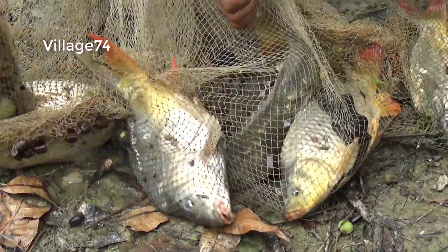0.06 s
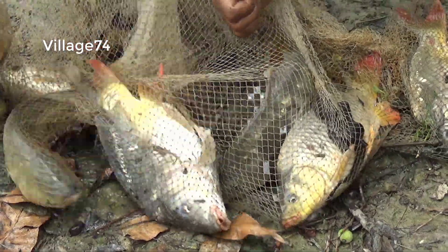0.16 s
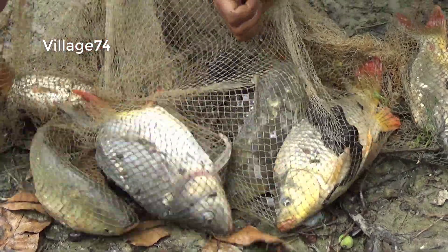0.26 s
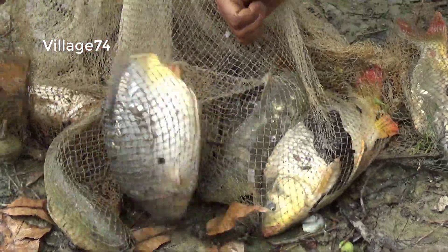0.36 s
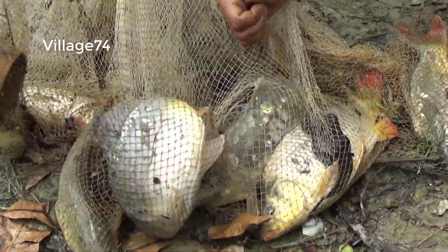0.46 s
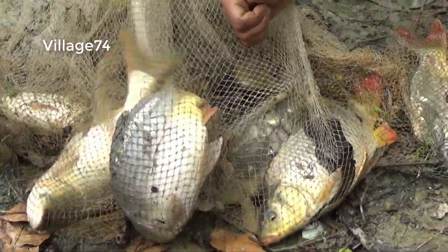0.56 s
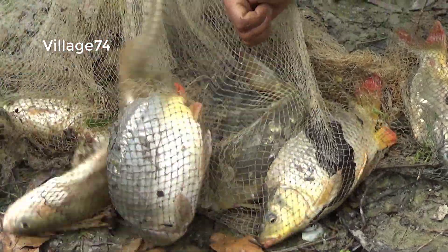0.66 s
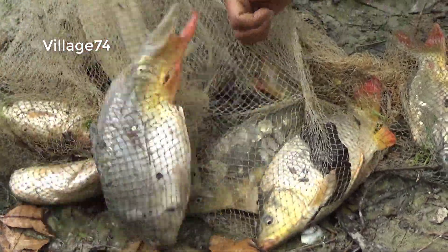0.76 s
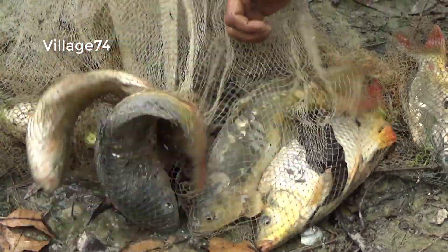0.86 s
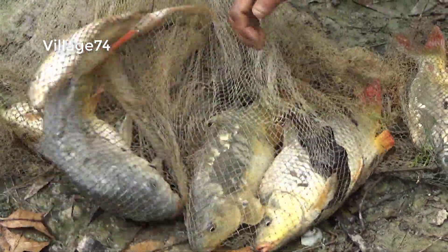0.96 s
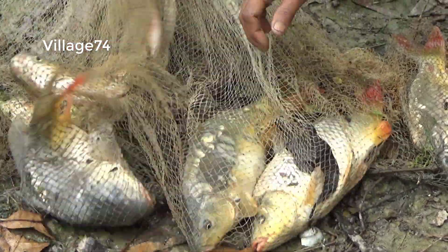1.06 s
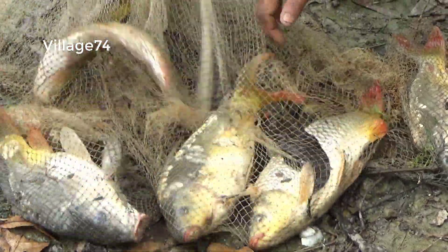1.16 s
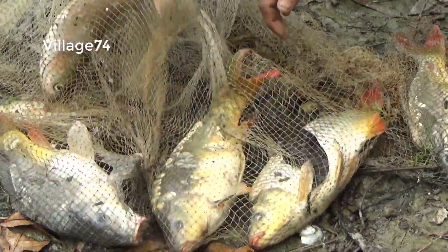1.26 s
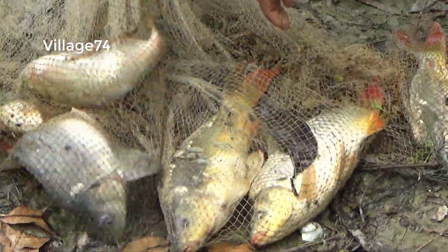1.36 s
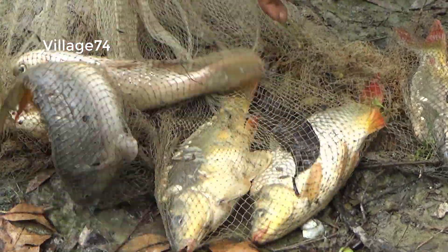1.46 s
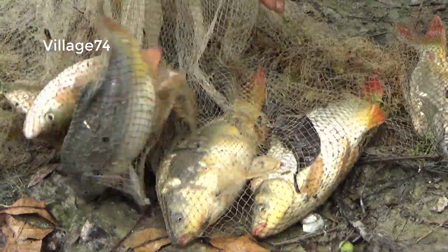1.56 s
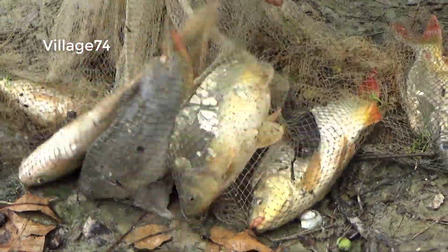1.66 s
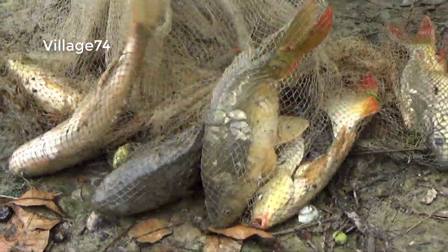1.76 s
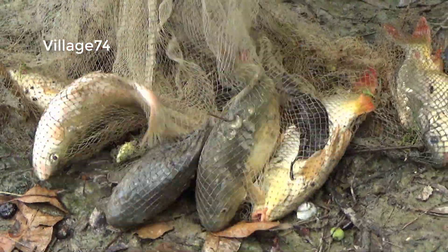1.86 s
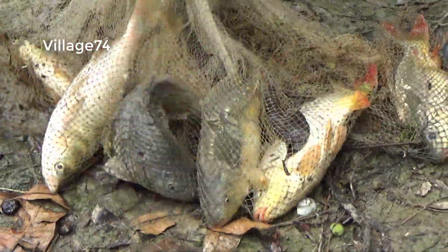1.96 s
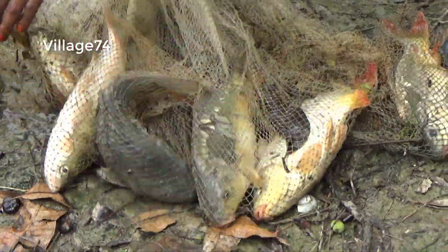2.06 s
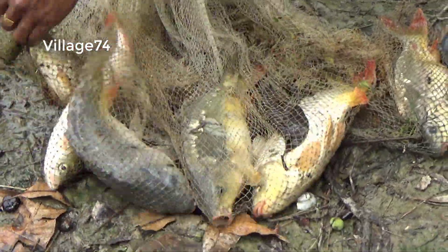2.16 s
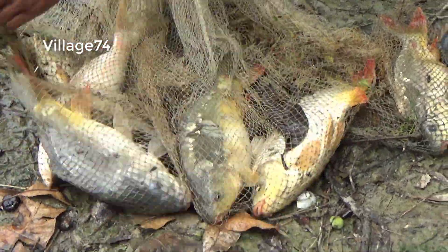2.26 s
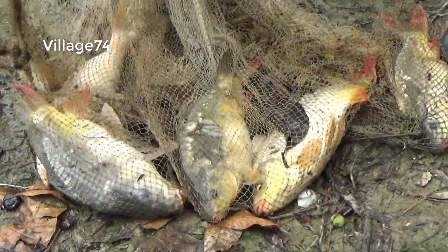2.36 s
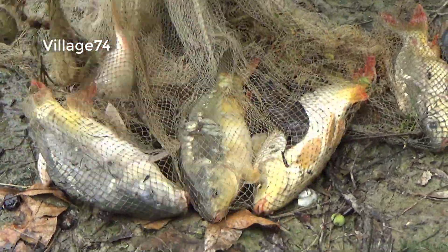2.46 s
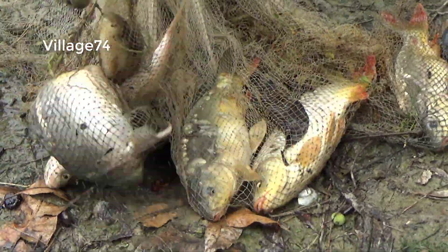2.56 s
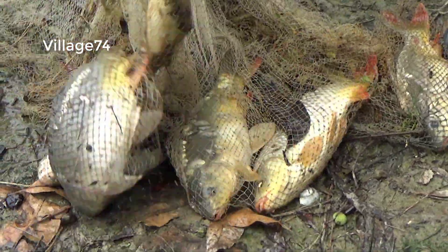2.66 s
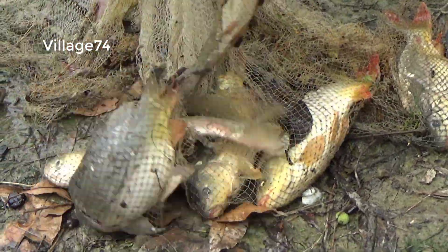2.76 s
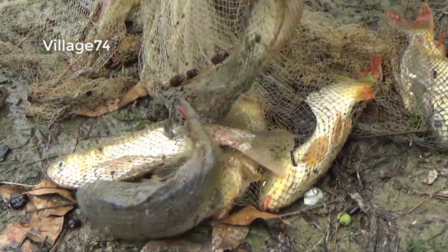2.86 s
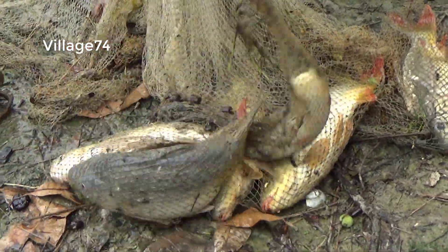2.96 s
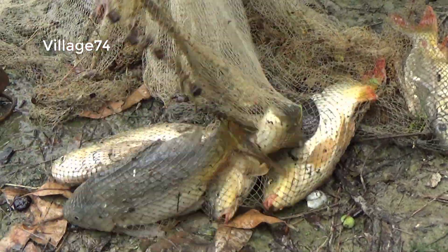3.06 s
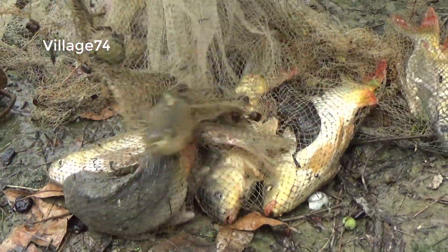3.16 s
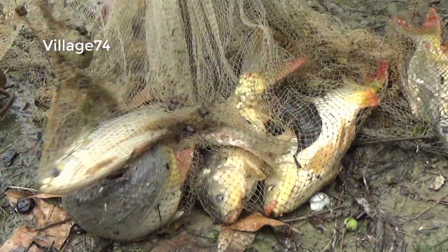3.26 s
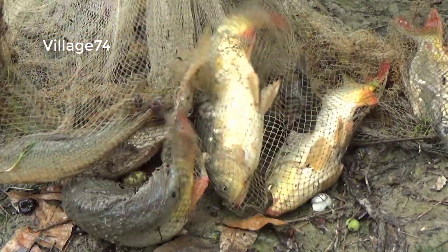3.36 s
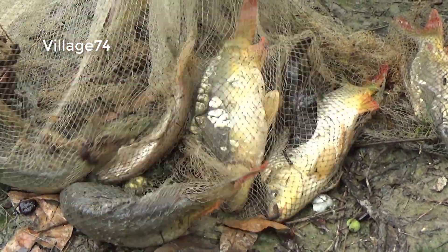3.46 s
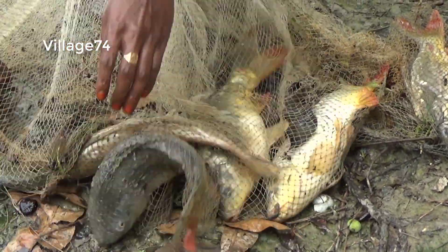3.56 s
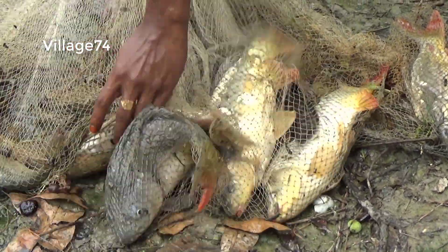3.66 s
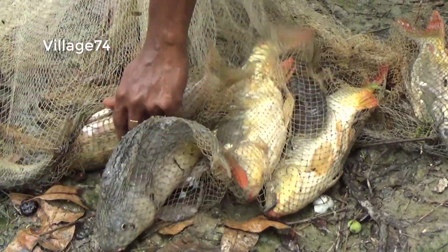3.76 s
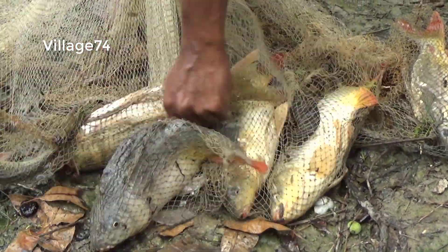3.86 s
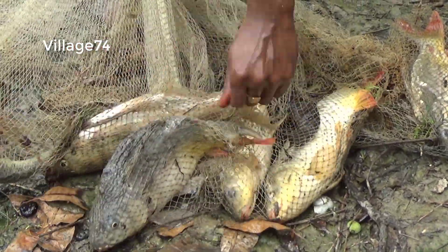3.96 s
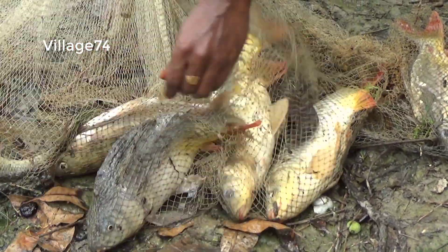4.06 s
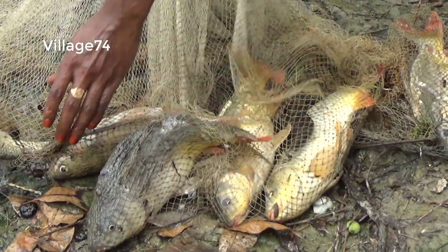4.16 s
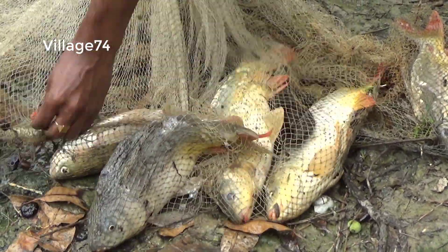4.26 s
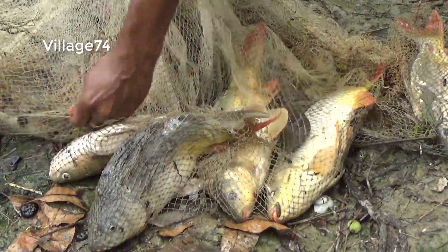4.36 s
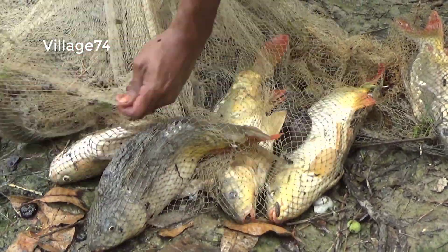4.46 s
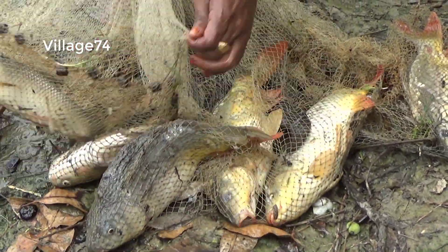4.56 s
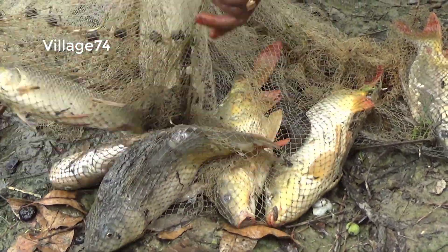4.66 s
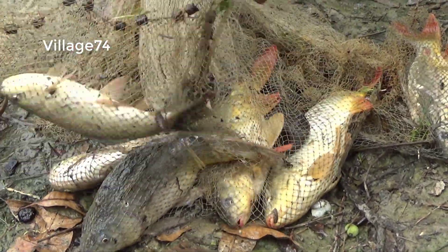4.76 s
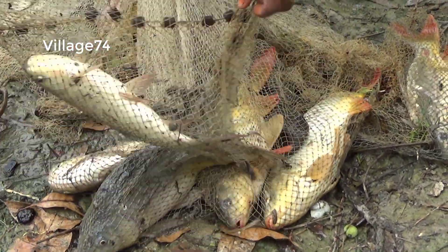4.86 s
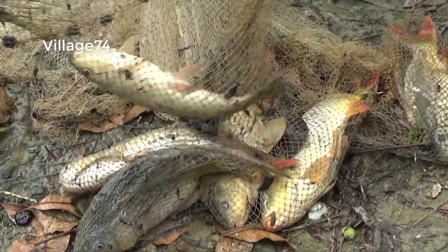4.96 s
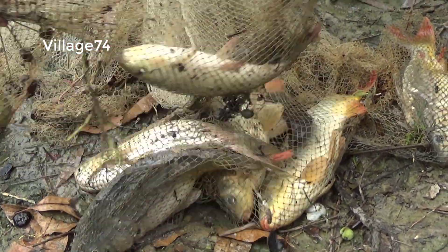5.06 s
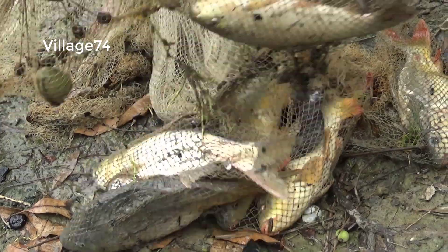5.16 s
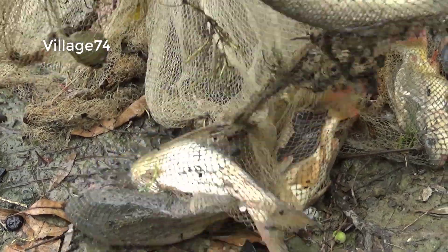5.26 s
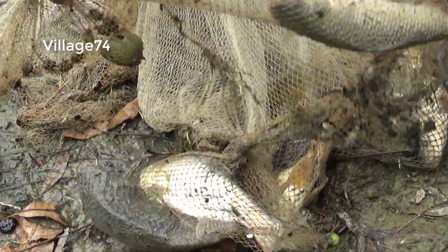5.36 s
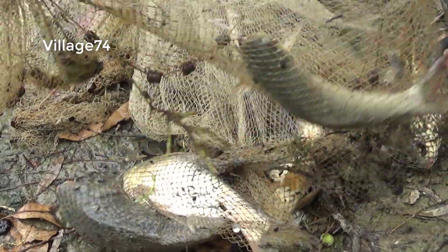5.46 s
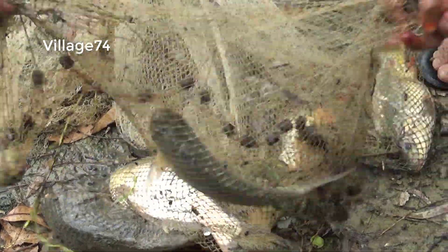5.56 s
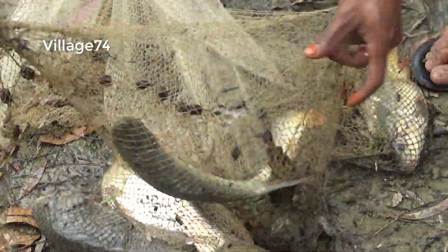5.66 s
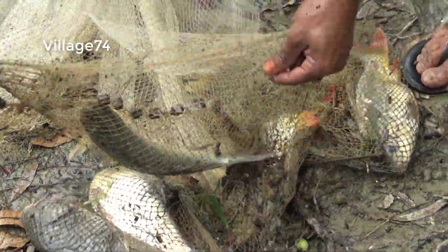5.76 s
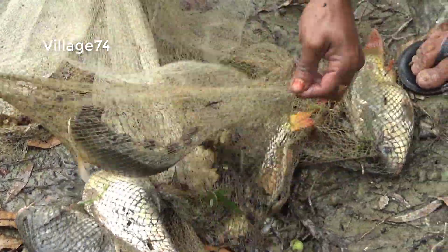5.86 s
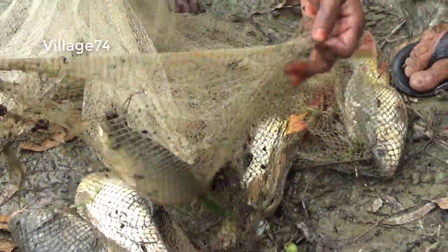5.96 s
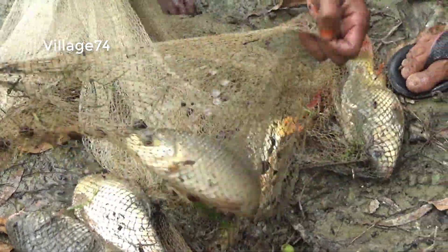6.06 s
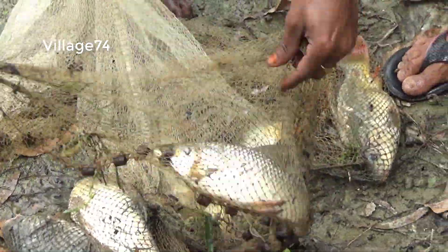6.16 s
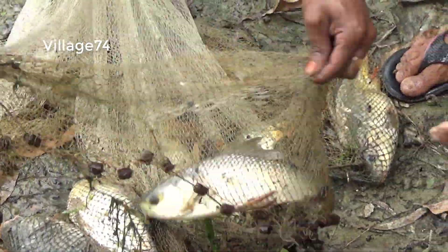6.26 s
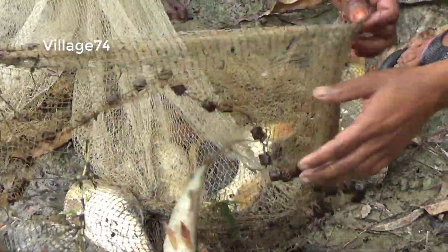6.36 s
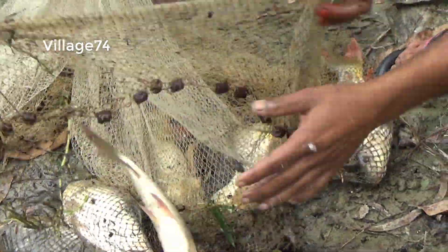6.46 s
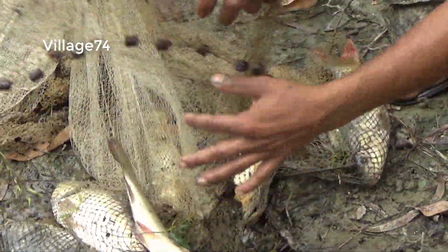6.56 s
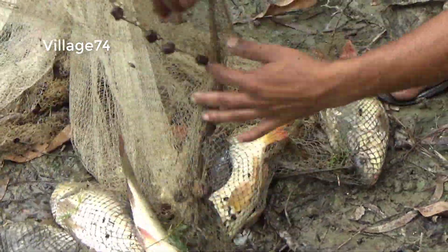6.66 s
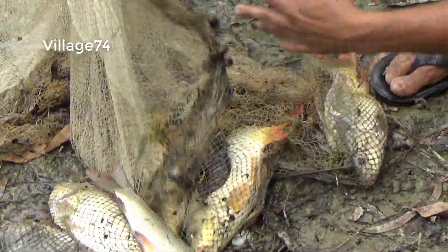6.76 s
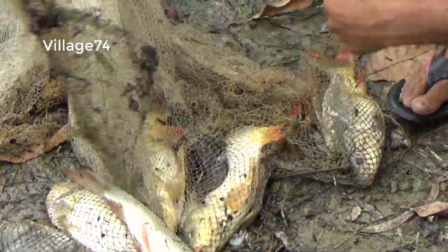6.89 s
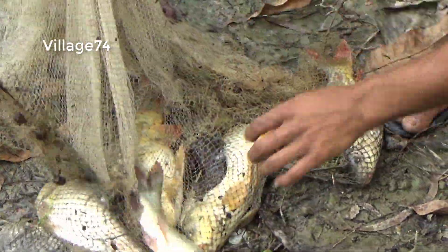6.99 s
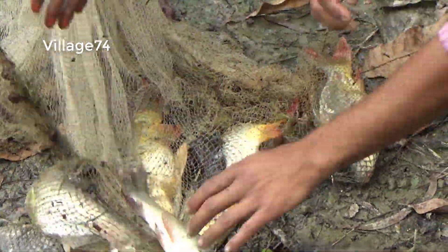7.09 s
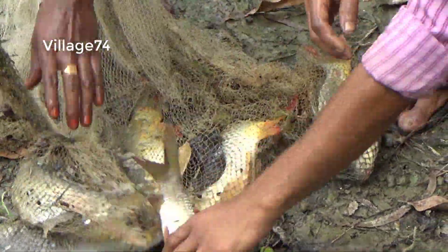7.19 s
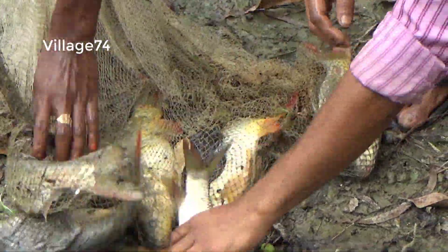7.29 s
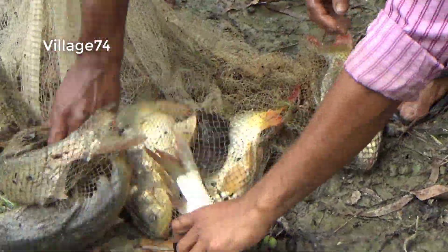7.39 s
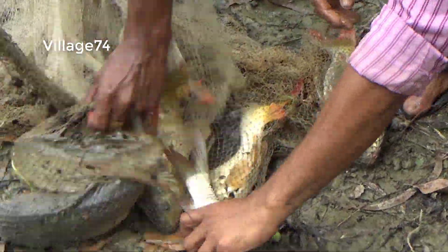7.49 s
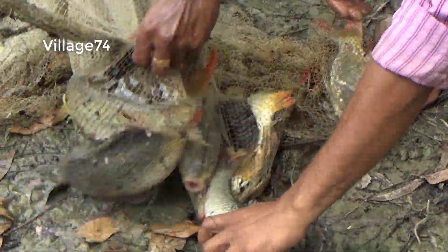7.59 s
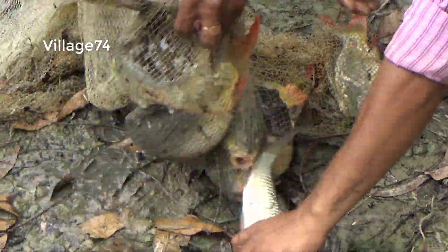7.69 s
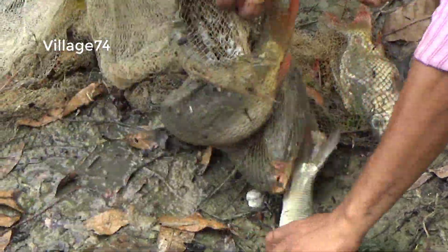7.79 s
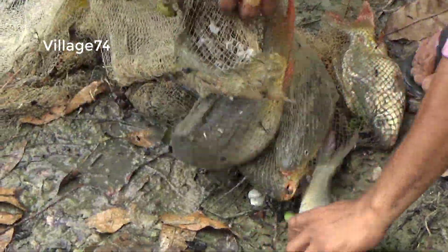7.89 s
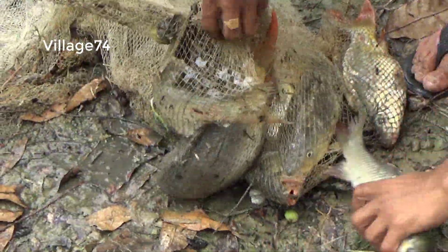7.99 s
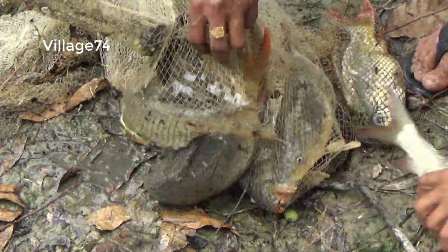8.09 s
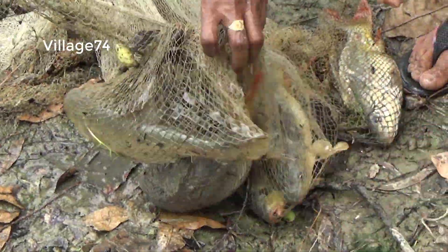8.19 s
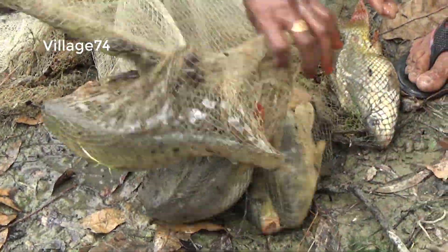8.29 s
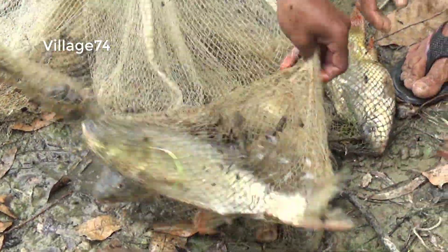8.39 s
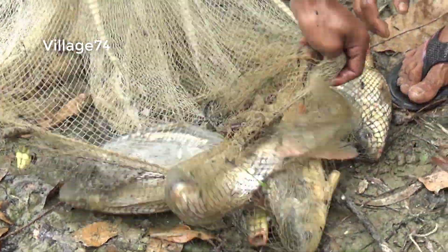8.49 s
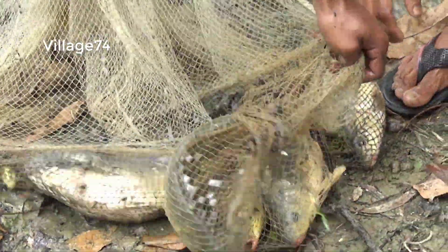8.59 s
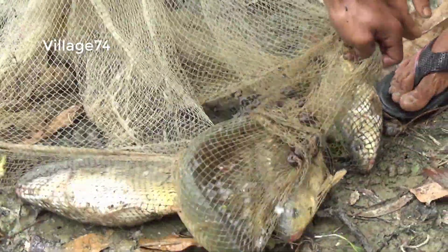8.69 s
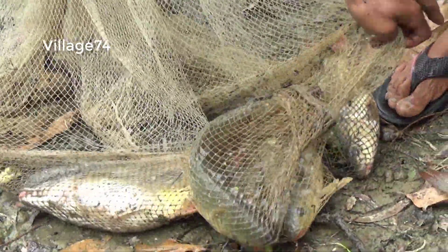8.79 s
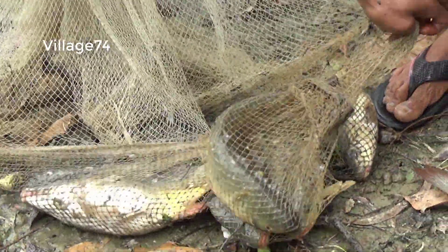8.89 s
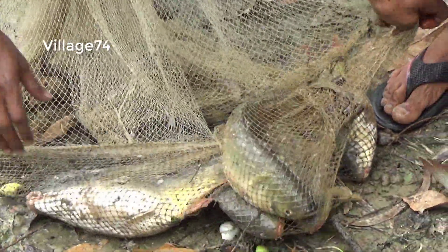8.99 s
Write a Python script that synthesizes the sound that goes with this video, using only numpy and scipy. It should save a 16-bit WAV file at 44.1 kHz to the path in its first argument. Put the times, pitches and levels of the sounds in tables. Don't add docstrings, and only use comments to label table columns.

```python
import sys
import numpy as np
from scipy import signal
from scipy.fft import rfft, irfft
from scipy.io import wavfile

SR = 44100
rng = np.random.default_rng(int(sys.argv[2]) if len(sys.argv) > 2 else 0)


def log_audio(samples):
    frames = np.atleast_2d(samples).T
    limited = np.clip(frames, -1, 1)
    pcm = np.round(limited * 32767).astype(np.int16)
    wavfile.write(sys.argv[1], SR, pcm)


def volts_from_db(level):
    exponent = np.asarray(level, float) / 20
    return 10 ** exponent


N = 398223


def rms_one(x):
    return x / np.sqrt(np.mean(x ** 2) + 1e-20)


def at_hz(points, hz):
    curve_hz, values = np.array(points)[:, 0], np.array(points)[:, 1]
    return np.interp(np.log(hz), np.log(curve_hz), values)


def band(x, low_hz, high_hz):
    return signal.sosfilt(signal.butter(2, [low_hz, high_hz], "band", fs=SR, output="sos"), x)


def resonance(x, hz, width_hz):
    r = np.exp(-np.pi * width_hz / SR)
    feedback = [1, -2 * r * np.cos(2 * np.pi * hz / SR), r * r]
    return signal.lfilter([(1 - r * r) / 2, 0, (r * r - 1) / 2], feedback, x)


def drift(rate):
    r = np.exp(-80 * np.pi * rate / SR)
    white = rng.standard_normal(N // 40 + 2002)
    slow = signal.lfilter([1], [1, -2 * r, r * r], white)[2000:]
    return np.interp(np.arange(N) / 40, np.arange(len(slow)), rms_one(slow))


def coloured(white, spectrum):
    # pitch in Hz, likeness from 0 to 1.
    likeness = [(30, .994), (70, .98), (250, .88), (800, .94), (2500, .9), (5000, .93), (9000, .98),
                (13000, .975)]
    hz = np.maximum(np.fft.rfftfreq(N, 1 / SR), 1)
    alike = np.clip(at_hz(likeness, hz), 0, 1)
    mid, side = rfft(white) * volts_from_db(at_hz(spectrum, hz))
    mid, side = mid * np.sqrt(1 + alike), side * np.sqrt(1 - alike)
    return rms_one(irfft(np.array([mid + side, mid - side]), N))


def crackle(per_s, spread_db, smooth_db):
    sizes = volts_from_db(spread_db * np.minimum(rng.exponential(1, N), 3))
    born = rng.random(N) < per_s * volts_from_db(6.0 * drift(25)) / SR
    ticks = signal.lfilter([1], [1, -.93], sizes * born)
    return (rms_one(ticks) + volts_from_db(smooth_db)) * rng.standard_normal((2, N))


def dying(seconds, level_db, t60, rise_s):
    out = np.zeros(N)
    for s, db, fall in np.broadcast(seconds, level_db, t60):
        fall, start = np.clip(fall, .0015, .3), round(s * SR)
        t = np.arange(min(int(fall * SR), N - start)) / SR
        out[start:start + len(t)] += volts_from_db(db - 60 * t / fall) * (1 - np.exp(-t / rise_s))
    return out


def spread(pair, side_db):
    return pair[0] + volts_from_db(side_db) * pair[1] * np.array([[1], [-1]])


def soft_blows():
    # start in seconds, ring peak in dB.
    pats = [(.1, -28), (.31, -22.5), (.319, -18), (0.461, -31), (.95, -26), (6.36, -28), (6.83, -32),
            (7.001, -40), (.966, -25.5), (.978, -35), (.992, -43), (.434, -24.5), (1.176, -23),
            (1.602, -27), (2.029, -26.5), (3.186, -17.5), (3.214, -15.5), (3.553, -27.5), (4.252, -24.5),
            (4.615, -35.5), (4.638, -35), (5.251, -26), (5.375, -18.5), (5.527, -29.5), (5.579, -19),
            (5.641, -15), (5.659, -20.5), (5.765, -23.5), (6.342, -32.5), (6.514, -27), (6.803, -36),
            (6.859, -33), (7.02, -21.5), (7.107, -25.5)]
    # start in seconds, smack in dB.
    taps = [(.167, -61), (.344, -51), (.499, -33), (.531, -27.5), (.574, -30), (0.817, -42), (.863, -23.5),
            (.929, -28), (3.908, -28.5), (8.735, -45), (8.94, -33), (1.74, -26), (1.92, -33),
            (2.261, -31.5), (2.603, -33.5), (3.319, -30), (3.588, -28), (5.855, -35), (6.565, -33),
            (7.761, -23), (7.864, -40.5), (8.467, -33), (8.563, -41)]
    # start in seconds, ring peak in dB.
    more_pats = [(0.167, -24), (0.332, -15), (0.36, -22), (0.769, -28), (0.822, -34), (0.476, -28),
                 (1.325, -26.5), (0.545, -24), (1.517, -33), (1.763, -43), (2.085, -31), (2.132, -32.5),
                 (2.152, -32), (2.811, -27.5), (3.255, -19.5), (3.386, -7), (3.502, -30), (3.609, -26),
                 (3.657, -26), (3.82, -26), (4.067, -26), (0.585, -31.5), (5.389, -20), (5.602, -14),
                 (5.734, -29.5), (5.752, -35), (5.79, -34), (5.856, -18.5), (2.062, -28), (6.818, -35),
                 (6.845, -32), (6.874, -31), (7.079, -36), (8.443, -34), (8.579, -24), (8.78, -38)]
    pocket_hz, pocket_spread_hz = 792.3, 35
    pat_smack_db, tap_ring_db, more_pats_gain_db = -15.5, -2, -5.5
    rows = [(s, db, db + pat_smack_db) for s, db in pats]
    rows += [(s, db + tap_ring_db, db) for s, db in taps]
    rows += [(s, db + more_pats_gain_db, db + pat_smack_db) for s, db in more_pats]
    return [(s, ring_db, pocket_hz + pocket_spread_hz * rng.standard_normal(), smack_db)
            for s, ring_db, smack_db in rows]


def slaps():
    # start in seconds, ring peak in dB, ring pitch in Hz, smack in dB.
    blows = [(0.208, -20, 854, -31), (0.381, -12, 770, -20), (.797, -18.5, 807, -30),
             (.88, -15.5, 760, -21), (1.156, -25.5, 845, -18), (1.207, -8, 803, -14.5),
             (1.221, -7.5, 863, -19), (1.237, -7, 786, -12.5), (1.252, -6.5, 824, -14.5),
             (1.392, -13, 804, -14), (1.408, -10, 850, -14), (3.002, -10.5, 730, -16.5),
             (3.015, -9, 785, -11), (3.05, -13.5, 795, -21), (3.37, -16.5, 740, -10.5),
             (3.373, -14, 726, -30), (3.395, -16.5, 755, -15.5), (4.43, -30, 896, -21),
             (4.924, -11, 775, -27), (4.954, -13, 745, -12), (5.082, -26, 757, -26), (5.207, -19, 775, -27),
             (5.389, -22, 853, -21), (5.611, -10.5, 795, -26.5), (5.873, -14.5, 761, -34),
             (6.984, -21, 730, -24), (7.054, -24, 782, -16), (7.072, -30, 810, -31), (.812, -26, 960, -26),
             (.822, -32, 980, -43), (7.39, -37, 820, -28.5), (8.67, -11.5, 858, -10)]
    # pitch in Hz, width in Hz, level in dB.
    body = [(1257, 59, -3), (1520, 130, -6), (1960, 270, -5), (2290, 83, -9.5), (2870, 24, -4),
            (3380, 120, -12), (3900, 46, -9.5), (4620, 390, -35), (6070, 920, -32)]
    s, ring_db, ring_hz, smack_db = np.transpose(blows + soft_blows())

    hollow, kicks = np.zeros(N), rng.standard_normal((len(s), 1500))
    t = np.arange(round(.12 * SR)) / SR
    kick_t = t[:1500]
    for start, db, hz, push in zip((s * SR).astype(int), ring_db, ring_hz, kicks):
        push = push + 0.14 * np.sin(2 * np.pi * hz * kick_t)
        kick_t60 = np.clip(0.017 + 0.000008 * db ** 2, .006, .2)
        push = push * volts_from_db(-60 * kick_t / kick_t60)
        push = push * (1 - np.exp(-kick_t / 0.0015))
        tone = np.sin(2 * np.pi * hz * t)
        modes = tone * volts_from_db(-60 * t / 0.035) + 0.05 * tone * volts_from_db(-60 * t / 0.11)
        ring = signal.fftconvolve(modes, push)[:min(len(t), N - start)]
        hollow[start:start + len(ring)] += volts_from_db(db) * ring / np.abs(ring).max()
    hollow = band(band(hollow, 444, 1190), 753, 3400)

    white, chance = rng.standard_normal((2, N)), 2 * rng.random((len(s), len(body))) - 1
    hit = dying(s, smack_db - 5.0, 0.01, 0.00019)
    after = dying(s, smack_db - 18.5, 0.22, 0.019)
    smack = rms_one(band(white, 610, 6200)) * (hit + after)
    for (hz, width_hz, db), own in zip(body, chance.T):
        strength = dying(s, smack_db + db + 12.0 + 7.7 * own, 0.045, 0.001)
        smack = smack + resonance(white * strength, hz, width_hz)
    return (hollow * volts_from_db([[.25], [-.25]]) + spread(smack, -12.5)) * volts_from_db([[.6], [-.6]])


def clicks():
    # start in seconds, peak in dB, pitch in Hz.
    hard = [(0.194, -16.5, 2670), (0.5596, -32, 3180), (0.596, -19, 3400), (0.8144, -22, 2850),
            (0.943, -20, 1420), (1.1047, -17.5, 2970), (1.125, -28, 3150), (1.193, -24, 3800),
            (1.517, -24.5, 1830), (1.6764, -30, 1770), (1.7619, -26, 1970), (1.8776, -35, 3400),
            (2.77, -26, 3130), (3.1363, -19, 4270), (3.8948, -24, 1490), (4.157, -24, 2970),
            (4.248, -13, 3140), (4.4298, -13.5, 2500), (5.0604, -19, 2770), (5.609, -16.5, 2350),
            (6.5895, -26.5, 2080), (7.433, -25, 3380), (7.65, -22, 2980), (8.733, -18.5, 1930)]
    # start in seconds, peak in dB, pitch in Hz.
    further_knocks = [(0.109, -21, 1100), (.735, -38, 1490), (.798, -19.5, 1160), (.81, -20, 2300), (.824, -19, 1300),
                      (1.1553, -15, 2050), (1.167, -17, 1580), (1.176, -21, 2000), (1.194, -28, 1400),
                      (2.262, -28, 1537), (2.604, -25, 1690), (4.238, -19, 3020), (4.4294, -10.5, 1890),
                      (4.925, -16, 580), (4.9534, -9, 2200), (5.872, -22, 2480), (6.911, -28.5, 1690),
                      (6.957, -28, 1400), (6.983, -23.5, 2560), (7.069, -20, 2300), (7.81, -30, 1280),
                      (8.404, -23.5, 1500), (8.446, -33, 990), (8.562, -31, 850), (8.669, -18, 1100),
                      (8.712, -27, 1400)]
    width_share, t60_s, gain_db = 0.18, 0.024, 9 - 14
    t = np.arange(round(.05 * SR)) / SR
    out = np.zeros((2, N + len(t)))
    white = rng.standard_normal((len(hard + further_knocks), 2, len(t)))
    strength = volts_from_db(-60 * t / t60_s) * (1 - np.exp(-t / 0.00063))
    for (s, db, hz), pair in zip(hard + further_knocks, white):
        burst = resonance(pair * strength, hz, width_share * hz)
        start = round(s * SR)
        out[:, start:start + len(t)] += volts_from_db(db + gain_db) * spread(burst / np.abs(burst[0]).max(), -18.0)
    return out[:, :N]


def sinker():
    # time in seconds, peak in dB, pitch in Hz, width in Hz.
    weight = (8.671, -17.5, 2925, 27)
    s, peak_db, hz, width_hz = weight
    knock = np.zeros(N)
    knock[round(s * SR)] = volts_from_db(peak_db) * SR / (2 * np.pi * width_hz)
    return resonance(knock, hz, width_hz)


def thuds():
    # start in seconds, peak in dB.
    landings = [(0.873, -19), (1.948, -23), (2.94, -30.5), (3.357, -35), (3.807, -21), (4.148, -27),
                (4.248, -32), (4.427, -30), (4.95, -38), (5.093, -22.5), (5.137, -24.5), (5.482, -30),
                (6.977, -26.5), (7.022, -32), (7.09, -37), (8.345, -31), (8.403, -25), (8.606, -25),
                (8.906, -29), (8.94, -26)]
    s, peak_db = np.transpose(landings)
    push = rng.standard_normal((2, N)) * dying(s, peak_db - 12.5, 0.05, 0.0022)
    upper = band(band(push, 161, 388), 70, 400) * volts_from_db(26.5)
    deep = band(push, 46, 130) * volts_from_db(21.5)
    return spread(upper + deep, -40.0)


def snaps():
    # start in seconds, peak in dB.
    threads = [(0.1212, -8.5), (0.2454, -8.5), (0.266, -9.5), (0.46, -11.5), (0.575, -1.5), (0.611, -10),
               (0.671, -17.5), (0.711, -12), (0.7643, -17), (0.8707, -3.5), (0.907, -2.5), (1.033, -9),
               (1.425, -9), (1.5615, -13), (1.872, -14), (2.246, -12), (2.985, -11), (3.18, -3.5),
               (3.202, -1), (3.2157, -1.5), (4.8702, -9.5), (5.974, -10), (6.321, -13), (6.3554, -18),
               (7.011, -4), (8.4726, -7.5), (8.5184, -5), (8.532, -3.5), (8.845, -17), (8.8836, -12.5)]
    # start in seconds, peak in dB.
    faint = [(0.2737, -19), (0.5023, -14), (0.5862, -14), (0.6374, -23), (0.7724, -16), (0.828, -20),
             (0.8826, -14), (0.9552, -16.5), (1.0226, -17.5), (1.062, -17), (1.136, -18), (1.152, -18),
             (1.1742, -18), (1.221, -15), (1.3014, -27), (1.6518, -19), (1.6806, -20), (1.7134, -20),
             (2.374, -29), (2.687, -30), (3.1363, -12), (3.282, -21), (3.294, -20), (3.3418, -21),
             (3.3838, -7), (3.5, -23), (3.9414, -21), (4.0712, -20), (4.448, -14), (4.8234, -28),
             (4.8876, -23), (5.3048, -19), (5.3295, -24), (5.4074, -24), (5.6397, -19.5), (5.656, -20),
             (5.7593, -24), (5.832, -22), (5.848, -21), (6.429, -25), (6.5281, -27), (6.56, -20.5),
             (6.785, -24), (6.825, -22.5), (7.1571, -36), (7.527, -25), (7.6042, -27), (7.8012, -26),
             (8.136, -23), (8.2237, -29), (8.2344, -23), (8.4936, -15), (8.539, -12.5), (8.5464, -21),
             (8.5634, -13), (8.63, -16), (8.735, -19.5), (8.8159, -19.5), (8.916, -16), (8.9416, -21)]
    # start in seconds, peak in
    # dB, lower part in dB relative to it.
    pulls_and_whips = [(.288, -18, -25), (0.727, -2, -7), (0.737, -6, -7.5), (3.822, -17.5, 10), (6.289, -20, -25),
                       (8.091, -20, -22), (1.7345, -9.5, -5), (1.784, -5.5, -11), (2.1308, -11.5, -9),
                       (2.6444, -13, -10), (2.9408, -4.5, -15), (3.1009, -6.5, -7), (3.3706, -7, -5),
                       (3.5542, -9, -5), (3.5719, -0.5, -3.5), (3.6053, -8, -16), (3.932, -15.5, -20),
                       (4.219, -9.5, -9), (4.4276, -6, -26), (5.957, -23, -6), (6.3717, -7, -24),
                       (6.685, -13.5, -9.5), (6.94, -10, -12), (7.5484, -17, 2), (8.4175, -1.5, -23),
                       (8.5757, -1, -10.5), (8.617, -11.5, -5), (8.9075, -14.5, -5),
                       (1.206, -17, 17.5), (1.253, -13, 10.5), (1.392, -39, 8), (1.954, -8.5, -3.5),
             (3.0013, -6.5, 10), (3.7925, -11.5, 0), (3.8068, -7, 4.5), (4.14, -11.5, -0.5),
             (4.248, -17, 1), (4.2653, -4.5, 4.5), (4.9531, -16.5, 14), (5.4862, -15, 4), (5.8752, -9, 5),
             (7.3898, -12, 6), (8.35, -16, 10), (8.408, -11, -1.5), (8.6687, -7.5, 7)]
    # pitch in Hz, level in dB per Hz.
    spray_colour = [(2650, -25), (4500, -16), (5080, -9), (6150, -6), (8970, 1), (9980, 1), (15100, -19),
                    (16000, -57)]
    thread_lower_db, faint_gain_db, thread_tail_db = -30, 4.5, -5
    events = [(s, db, thread_lower_db) for s, db in threads]
    events += [(s, db + faint_gain_db, thread_lower_db) for s, db in faint]
    s, peak_db, lower_db = np.transpose(events + pulls_and_whips)
    is_thread = np.arange(len(s)) < len(events)
    t60 = 0.04 + 0.00076 * peak_db
    ragged = volts_from_db(3.7 * drift(410))
    tick = volts_from_db(-3.0) * dying(s, peak_db - 4.0 * ~is_thread, 0.003, .0002)
    tail = dying(s - .004, peak_db - 9.5 + thread_tail_db * is_thread, t60, 0.0043)
    bright = coloured(rng.standard_normal((2, N)), spray_colour) * (tick + tail * ragged)
    dull = rms_one(band(rng.standard_normal((2, N)), 1140, 7700))
    dull = dull * dying(s, peak_db + lower_db - 15.0, t60, 0.00047)
    return bright + spread(dull, -16.0) * ragged


def scrapes():
    # start, top and end in seconds, level in dB.
    strokes = [
        (-.05, 0.04, 0.12, -30),
        (5.05, 5.2, 5.295, -29),
    ]
    # pitch in Hz, width in Hz, level in dB.
    scales = [(1100, 500, 3.5), (2490, 480, -6.5), (3400, 2000, 4), (4400, 570, 0), (5000, 320, 4),
              (5500, 530, -15), (9150, 1700, -28)]
    grains = crackle(1500, spread_db=6.0, smooth_db=8.0)
    sound = rms_one(sum(volts_from_db(db) * resonance(grains, hz, width_hz) / np.sqrt(width_hz)
                        for hz, width_hz, db in scales))
    t = np.arange(N) / SR
    stroke = sum(volts_from_db(db) * np.sqrt(np.interp(t, [start, top, end], [0, 1, 0]))
                 for start, top, end, db in strokes)
    return spread(sound, -16.0) * stroke


def net_motion():
    # top, swell and settle in seconds, bodies rubbing in dB, spray in dB.
    jerks = [(0.001, .05, 0.12, -26, -27), (0.209, 0.033, 0.034, -27, -29), (0.329, 0.038, 0.094, -32, -30),
             (.59, 0.21, 0.036, -35.5, -37), (.88, 0.25, 0.41, -37, -36.5),
             (1.092, 0.018, 0.037, -28.5, -27), (1.24, 0.12, 0.28, -31.5, -41.5),
             (1.41, 0.071, 0.27, -38, -38), (1.95, 0.3, 0.26, -37, -33.5), (2.6, 0.071, 0.89, -46.5, -36),
             (3.02, 0.014, 0.14, -29.5, -35), (3.2, 0.18, 0.096, -30, -31.5),
             (3.389, 0.048, 0.058, -27, -24), (3.59, 0.11, 0.19, -33, -28), (3.91, 0.56, 0.013, -41, -36),
             (4.27, 0.42, 0.11, -38.5, -36.5), (4.939, 0.01, 0.074, -29, -59),
             (5.21, 0.19, 0.22, -33.5, -32), (5.39, 0.17, 0.21, -38, -40), (5.85, 0.33, 0.42, -43.5, -42.5),
             (7.07, 0.39, 0.1, -42.5, -42), (8.42, 0.32, 0.25, -45, -34.5),
             (8.549, 0.048, 0.079, -55, -28.5), (8.7, 0.24, 0.16, -40.5, -38)]
    # time in seconds, level in dB.
    handling = [(0.0, -44.5), (1.81, -50), (9.03, -46.5)]
    # time in seconds, half length in seconds, change in dB.
    level_changes = [(0.94, 0.014, 7), (1.49, 0.0079, -8), (1.744, 0.013, 13), (2.39, 0.068, 7), (2.865, .035, -11),
                     (2.97, 0.023, 3), (3.702, 0.065, -3.5), (4.012, 0.018, -13), (4.53, 0.0075, -3),
                     (4.637, 0.027, 4), (4.814, 0.018, -6), (5.483, .012, 13), (5.62, .012, 6.5), (6.08, 0.057, -8),
                     (6.281, 0.027, -11), (6.498, .02, -9), (6.645, 0.016, -7), (6.765, 0.031, 1), (6.872, .02, -4),
                     (6.94, 0.042, 7), (7.148, 0.072, -1.5), (7.424, .012, 5), (7.608, 0.051, 6.5),
                     (8.072, 0.017, -4), (8.382, 0.011, -4), (9.01, 0.018, -10)]
    jerk_range_db, hands_rub_db = 15, -4.5
    rub_follows_change, mesh_from_rub, mesh_gain_db = 0.24, 0.27, -2.5
    t = np.arange(0, N + 64, 64) / SR
    top, swell, settle, rub_db, spray_db = np.transpose(jerks)[:, :, None]
    before, after = (top - t) / np.maximum(swell, .01), (t - top) / np.maximum(settle, .01)
    shape_db = -jerk_range_db * np.maximum(before, after)
    hands_db = np.interp(t, *np.transpose(handling))
    rub_db = np.maximum((rub_db + shape_db).max(axis=0), hands_db + hands_rub_db)
    spray_db = np.maximum((spray_db + shape_db).max(axis=0), hands_db)
    s, half, change_db = np.transpose(level_changes)[:, :, None]
    level_change_db = (change_db * np.exp(-.5 * ((t - s) / half) ** 2)).sum(axis=0)
    rub_db, spray_db = rub_db + rub_follows_change * level_change_db, spray_db + level_change_db
    mesh_db = mesh_from_rub * rub_db + (1 - mesh_from_rub) * spray_db + mesh_gain_db
    return (np.interp(np.arange(N) / SR, t, level) for level in (rub_db, mesh_db, spray_db))


def rustle():
    # pitch in Hz, level in dB per Hz.
    rub_colour = [(100, -32), (330, -3), (500, -12.5), (780, 4), (1000, -3), (1500, -33)]
    mesh_colour = [(900, -14.5), (1300, 4), (2500, 1.5), (4500, 4.5), (6500, -12.5)]
    spray_colour = [(2650, -25), (4500, -16), (5080, -9), (6150, -6), (8970, 1), (9980, 1), (15100, -19),
                    (16000, -57)]
    rub_db, mesh_db, spray_db = net_motion()
    shake = drift(32.0)
    rub = coloured(crackle(250, spread_db=1.0, smooth_db=-8.0), rub_colour)
    mesh = coloured(crackle(600, spread_db=1.0, smooth_db=-2.0), mesh_colour)
    spray = coloured(crackle(560, spread_db=4.5, smooth_db=1.0), spray_colour)
    rub = rub * volts_from_db(rub_db - 6.5 + 3.35 * shake)
    mesh = mesh * volts_from_db(mesh_db - 2.5 + 1.5 * shake)
    spray = spray * volts_from_db(spray_db - 2.0 + 1.3 * shake)
    return rub + mesh + spray


def add_note(out, s, shape, db):
    when, hz, level_db = np.transpose(shape)
    t = np.arange(when[0], when[-1], 1 / SR)
    edge = np.clip(np.minimum(t - t[0], t[-1] - t) / 0.0045, 0, 1)
    tone = np.sin(2 * np.pi * np.cumsum(np.interp(t, when, hz)) / SR)
    note = tone * edge * volts_from_db(db + np.interp(t, when, level_db))
    start = round((s + when[0]) * SR)
    out[start:start + len(t)] += note[:max(N - start, 0)]


def trees(x, t60, wet_db, pan_db):
    t = np.arange(round(.6 * SR)) / SR
    tail = spread(rng.standard_normal((2, len(t))), -6.0)
    tail = tail * volts_from_db(-60 * t / t60) * (1 - np.exp(-t / 0.00042))
    echo = signal.fftconvolve(x[None], tail / np.sqrt(np.sum(tail[0] ** 2)), axes=1)[:, :N]
    return (x + volts_from_db(wet_db) * echo) * volts_from_db([[pan_db], [-pan_db]])


def birds():
    # start of each rising chip, then of the falling whistle that follows it, in seconds.
    chip_times = [2.536, 2.856, 3.167, 3.486, 3.806, 4.135, 4.455, 4.804, 5.148, 5.484, 5.851, 6.2, 6.549,
                  6.888, 7.226, 7.613, 7.952, 8.291, 8.657, 9.007]
    whistle_times = [2.33, 2.662, 2.981, 3.287, 3.606, 3.922, 4.264, 4.581, 4.926, 5.268, 5.611, 5.977,
                     6.324, 6.669, 7.018, 7.366, 7.728, 8.072, 8.433, 8.789]
    # time in seconds, pitch in Hz, level in dB.
    chip = [(0, 4104, 9), (.007, 5026, 3.5), (0.016, 5650, -0.5), (.026, 5100, -6)]
    whistle = [(0, 3650, -7), (.02, 3350, 0), (.05, 2500, -4), (.08, 1950, -13)]
    # time in seconds, level in dB.
    hook_tops = [(4.291, -28), (4.546, -25.5), (4.704, -26), (4.952, -26), (5.102, -24.5), (5.354, -25.5),
                 (5.51, -26.5), (5.772, -27), (5.929, -27.5)]
    # time in seconds, pitch in Hz, level in dB.
    hook = [(-.022, 1970, -15), (-.011, 3042, -6), (-.006, 3503, -1), (-.002, 4142, -8), (.003, 4164, -0.5),
            (.012, 3990, -0.5), (.019, 3750, -0.5), (.026, 3300, -0.5), (0.043, 2430, -10)]
    # start and length in seconds, start and end pitch in Hz, level in
    # dB.
    slurs = [
        (3.242, 0.071, 2530, 1910, -40.5),
        (3.33, 0.033, 1730, 1610, -44),
        (3.585, 0.073, 2550, 1960, -40.5),
        (3.682, 0.075, 1780, 1500, -45.5),
        (8.618, 0.028, 2260, 2300, -51),
        (2.223, 0.02, 5100, 3900, -49),
        (2.8, 0.06, 4300, 3290, -51),
        (6.636, 0.05, 2970, 3076, -43.5),
        (8.97, 0.078, 2120, 2680, -48.5),
    ]
    chip_db, whistle_db = -44.5, -41
    loudest_s, rise_db_per_s, fade_db_per_s = 3.4, 1.5, 0.54
    far, hooked, near = np.zeros((3, N))
    for times, shape, db in ((chip_times, chip, chip_db), (whistle_times, whistle, whistle_db)):
        for s in times:
            slope = rise_db_per_s if s < loudest_s else fade_db_per_s
            add_note(far, s, shape, db - slope * abs(s - loudest_s))
    for s, db in hook_tops:
        add_note(hooked, s, hook, db - 11.0)
    for s, length, start_hz, end_hz, db in slurs:
        middle_hz = (start_hz + end_hz) / 2
        add_note(near, s, [(0, start_hz, -3), (length / 2, middle_hz, 0), (length, end_hz, -2.5)], db)
    first = trees(far * volts_from_db(2.5 * drift(150)), .55, 6.5, 2.2)
    second = trees(hooked * volts_from_db(1.5 * drift(150)), .5, 2.5, 3.2) * volts_from_db(-1.0)
    slurred = trees(near * volts_from_db(1.0 * drift(60)), 0.38, 3.5, 2.1)
    return first + second + slurred


def outdoor_air():
    # pitch in Hz, level in dB per Hz.
    air_colour = [(15, -37), (25, 4), (217, 6), (489, 0.5), (796, 0), (1100, -5), (1480, -12), (3340, 1.5),
                  (3720, -11), (5880, -4.5), (9320, -23), (13600, -24), (16000, -19)]
    return coloured(rng.standard_normal((2, N)), air_colour) * volts_from_db(-52.5 + drift(3.5))


def scene():
    fish = slaps() + clicks() + sinker() + thuds()
    net = snaps() + scrapes() + rustle()
    return fish + net + birds() + outdoor_air()


def roll_off(x):
    return signal.sosfilt(signal.butter(12, 16500, fs=SR, output="sos"), x)


def record(dry):
    dull = signal.sosfilt(signal.butter(4, 14800, fs=SR, output="sos"), dry)
    rounded = .8 * np.tanh(dull / .8)
    mix = signal.sosfilt(signal.cheby2(10, 50, 16700, fs=SR, output="sos"), rounded)
    return roll_off(mix)


dry = scene()
out = record(dry)
log_audio(out)
```